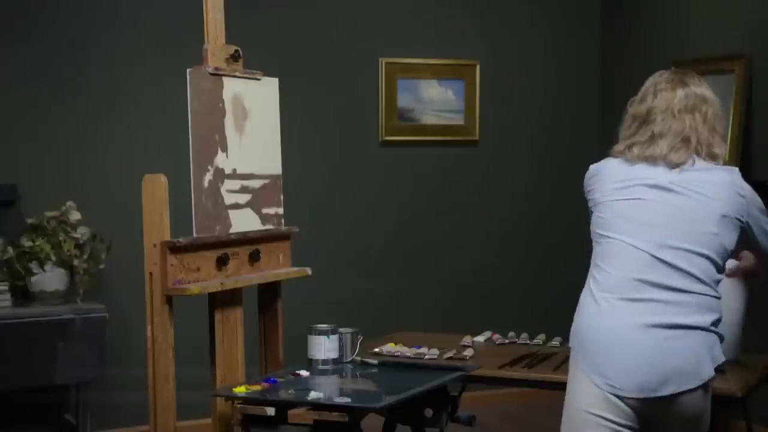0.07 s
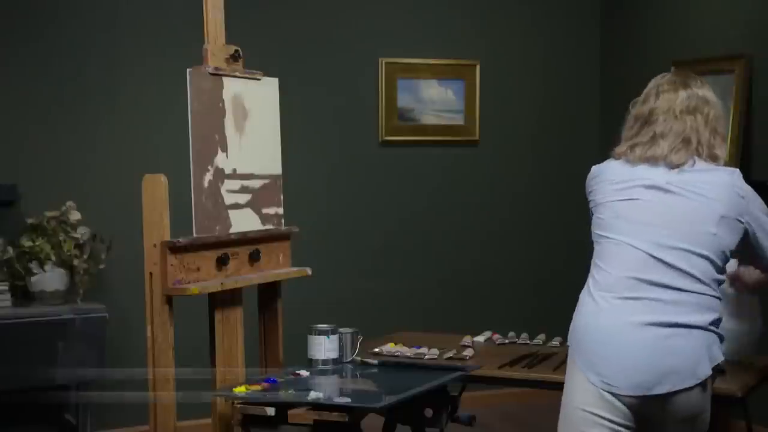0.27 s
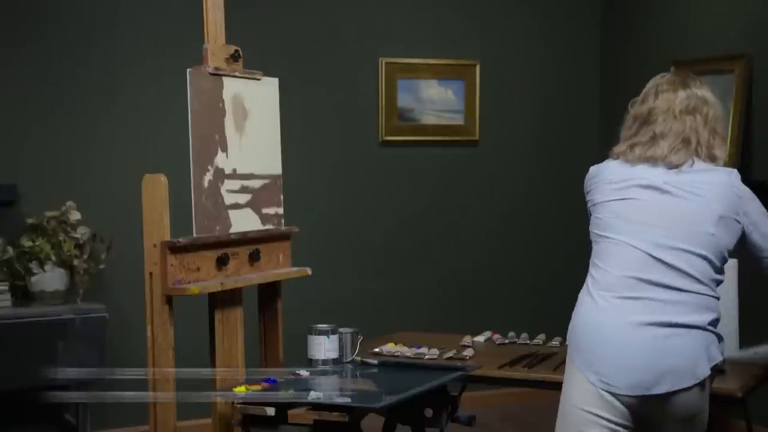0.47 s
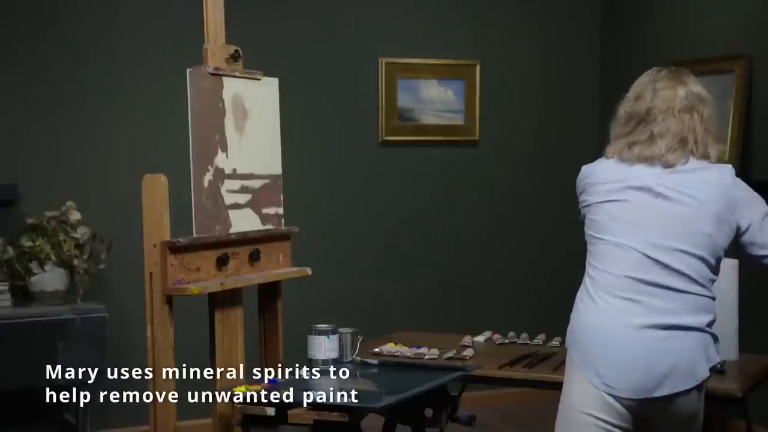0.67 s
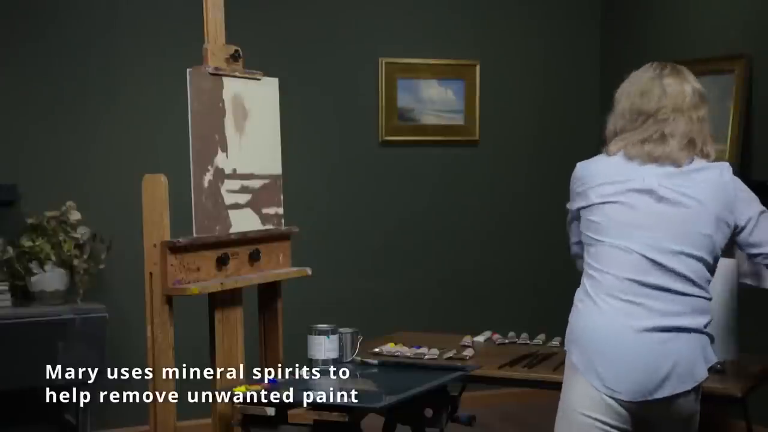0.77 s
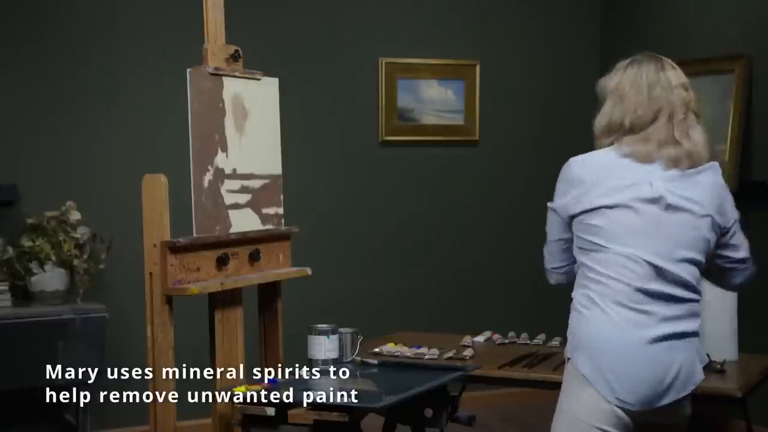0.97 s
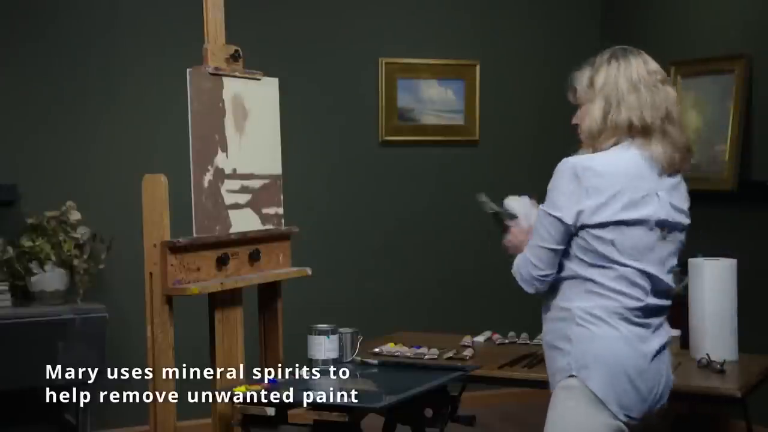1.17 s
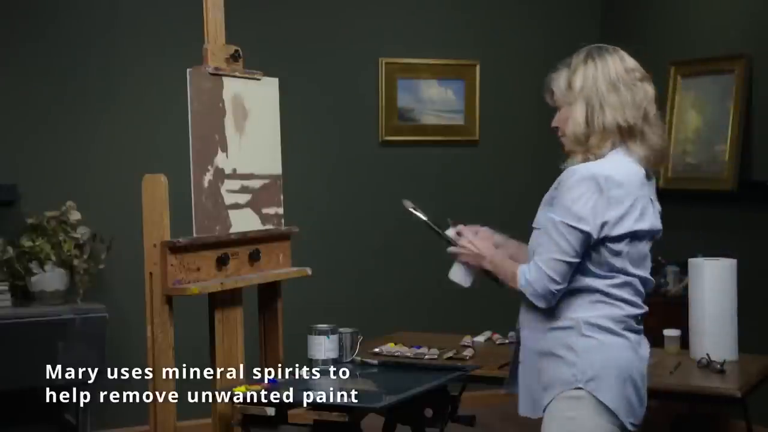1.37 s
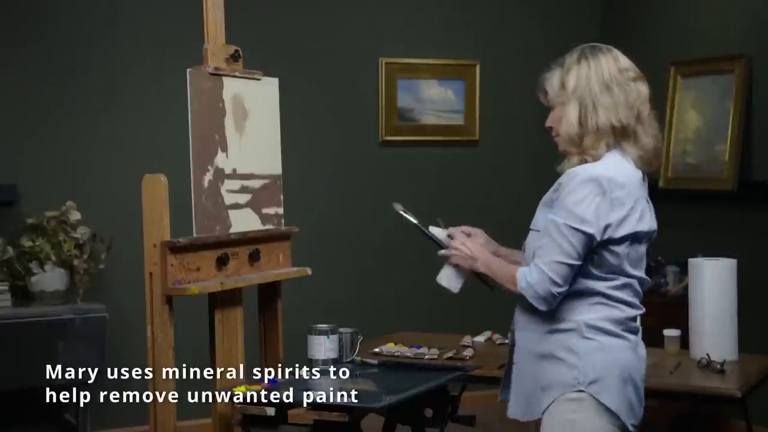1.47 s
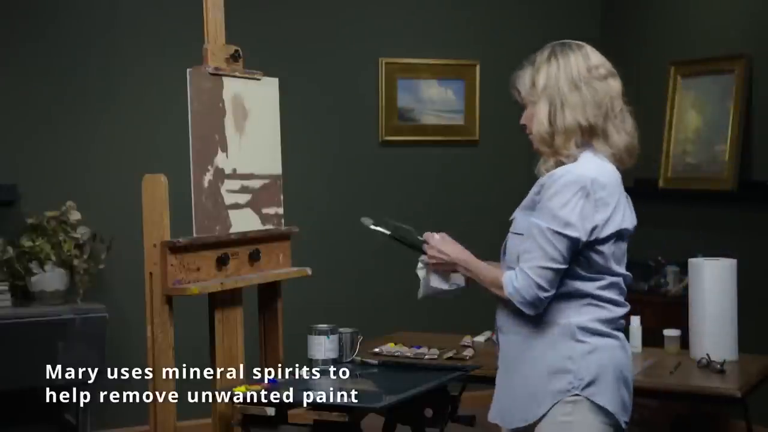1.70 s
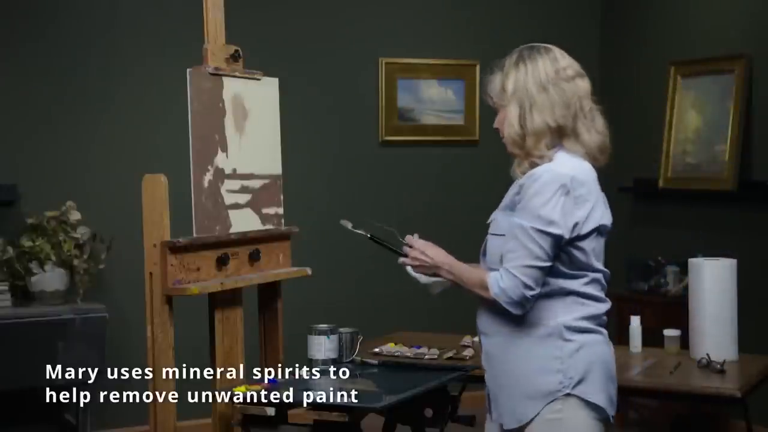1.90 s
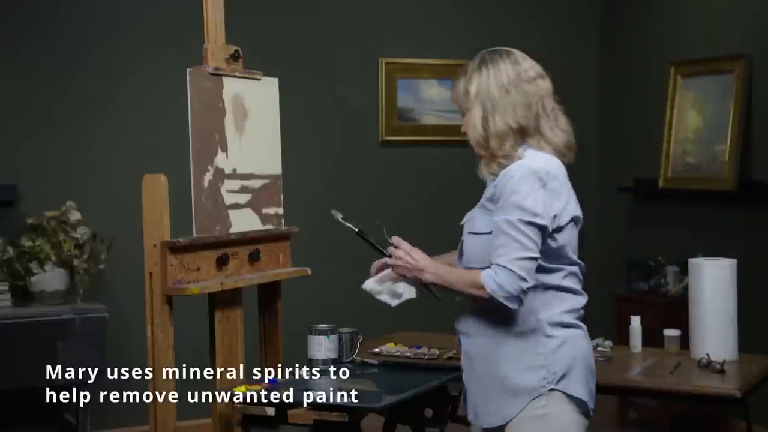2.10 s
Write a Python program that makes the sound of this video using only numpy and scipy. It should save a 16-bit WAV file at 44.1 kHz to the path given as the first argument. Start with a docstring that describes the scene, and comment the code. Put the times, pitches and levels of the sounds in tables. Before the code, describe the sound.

Close up in a quiet studio, a paper towel is ripped from the roll in one short pull. Soft footsteps and rustling sleeves follow as the sheet is gathered and folded, with one light wooden tick.

```python
"""Tearing off a paper towel

A sheet is ripped off its roll, close to a body-worn microphone in a quiet studio. The perforation
gives with a snap and unzips in a run of pops, over a rising flutter as the sheet comes free. Paper and
sleeves rustle, steps thud softly, a wooden handle ticks and the sheet flaps as it is folded."""
import sys
import numpy as np
from scipy import signal
from scipy.fft import rfft, irfft
from scipy.io import wavfile
from scipy.ndimage import uniform_filter1d

SR = 44100
rng = np.random.default_rng(int(sys.argv[2]) if len(sys.argv) > 2 else 0)


def digitize_waveform(pressure):
    """Quantize a signal to 16-bit integers and store it at the path in sys.argv[1].

    Rows of a 2-D input are taken as channels; values are limited to [-1, 1].
    """
    field = np.atleast_2d(pressure).T
    bounded = np.clip(field, -1, 1)
    quanta = np.round(bounded * 32767).astype(np.int16)
    wavfile.write(sys.argv[1], SR, quanta)


N = 94594
T = np.arange(N) / SR

# Tone of breaking fibres. Each row: frequency in Hz, gain in dB.
FIBRE_COLOUR = [(500, -3), (3200, 2.5), (5000, -18), (6500, 0.5), (8500, -5), (11500, -12), (15000, -7)]
# Tone of paper gathered in the hand. Each row: frequency in Hz, gain in dB.
GATHER_COLOUR = [(130, -5), (350, 2), (3200, 1), (6200, -15.5), (8000, -14.5), (10700, -11.5), (13000, -18)]
FIBRES_PER_S, FIBRE_SPREAD_DB = 11000, 1.5
RUBS_PER_S, RUB_SPREAD_DB = 14000, 2


def amp(db):
    """Decibels to gain."""
    return 10 ** (np.asarray(db) / 20)


def unit(x):
    """Scales to rms 1."""
    return x / np.sqrt(np.mean(x ** 2) + 1e-20)


def read(points, hz):
    """Reads a curve on a log-frequency axis."""
    f, value = np.transpose(points)
    return np.interp(np.log(hz + 1), np.log(f + 1), value)


def fader(curve, column=1):
    """Gain over time from a dB curve, dying quickly beyond its ends."""
    columns = np.transpose(curve)
    times, db = columns[0], columns[column]
    outside_s = np.maximum(times[0] - T, 0) + np.maximum(T - times[-1], 0)
    return amp(np.interp(T, times, db) - 1000 * outside_s)


def colour(x, points, depth=1):
    """Minimum-phase EQ; depth scales its dB curve."""
    hz = abs(np.fft.fftfreq(4096, 1 / SR))
    log_gain = np.log(amp(depth * read(points, hz)))
    taps = np.fft.ifft(np.exp(np.conj(signal.hilbert(log_gain)))).real
    return signal.fftconvolve(x, taps[:len(taps) // 2])[:N]


def grains(per_s, spread_db):
    """Random clicks of either sign, a few larger than the rest."""
    size = amp(spread_db * np.minimum(rng.exponential(1, N), 4))
    return size * rng.choice([-1, 1], N) * (rng.random(N) < per_s / SR)


def wander(hz):
    """Smooth random drift of rms 1, up to about the given rate."""
    lowpass = np.exp(-(np.fft.rfftfreq(N, 1 / SR) / hz) ** 2)
    return unit(irfft(rfft(rng.standard_normal(N)) * lowpass, N))


def swell(s, db, width_s):
    """Bell-shaped envelope that peaks at time s."""
    return amp(db) * np.exp(-((T - s) / width_s) ** 2 / 2)


def room_tone():
    """Two steady noise beds: low rumble and soft air."""
    # Tone of each bed. Each row: frequency in Hz, gain in dB.
    rumble_colour = [(30, 1), (125, 1.5), (200, -8), (1500, -46)]
    air_colour = [(50, -22), (125, 2.5), (420, 4), (1400, -5), (4500, -14), (15000, -21)]
    rumble = amp(-63) * unit(colour(rng.standard_normal(N), rumble_colour))
    air = amp(-69) * unit(colour(rng.standard_normal(N), air_colour))
    return rumble, air


def rustle():
    """Paper and sleeves rub in dense tiny slips as the hands reach, gather and fold."""
    # Fader ride of each move. Each row: time in seconds, level in dB.
    reach = [(0, -76), (.06, -65.5), (.15, -69.5), (.21, -60), (.275, -66.5), (.335, -55.5), (.5, -65),
             (.74, -74.5), (.81, -62.5), (.88, -61.5), (.92, -76), (.98, -63)]
    gather = [(1.0, -59), (1.014, -55.5), (1.10, -55.5), (1.15, -53.5), (1.175, -55.5), (1.2, -52.5),
              (1.265, -53.5), (1.31, -60.5), (1.37, -55), (1.42, -56), (1.47, -66.5)]
    fold = [(1.49, -64.5), (1.535, -61.5), (1.575, -72), (1.645, -65.5), (1.715, -52.5), (1.755, -57),
            (1.84, -50.5), (1.88, -52), (1.92, -60.5), (2.03, -67.5), (2.10, -63.5), (2.145, -66)]
    # Tone of the reach and of the fold. Each row: frequency in Hz, gain in dB.
    reach_colour = [(150, -13.5), (400, -2), (1800, -4.5), (3500, -10.5), (5000, -20), (7500, -14),
                    (15000, -20.5)]
    fold_colour = [(150, -13.5), (1000, -8.5), (2000, -5.5), (3800, -12.5), (6000, -21), (8200, -29),
                   (10500, -21.5), (15000, -24)]
    rubs = np.zeros(N)
    for ride, tone in [(reach, reach_colour), (gather, GATHER_COLOUR), (fold, fold_colour)]:
        rubs += fader(ride) * unit(colour(grains(RUBS_PER_S, RUB_SPREAD_DB), tone))
    flicker_db = 0.96 * wander(hz=68.6)
    return rubs * amp(flicker_db)


def scrapes():
    """Dense slips ring one resonance for a moment."""
    # The roll on its holder, the sheet sliding free, paper dragged through the fingers. Each row:
    # centre in seconds, half-width in seconds, pitch in Hz, bandwidth in Hz, level in dB.
    strokes = [(0.062, .04, 1313, 338, -61.5), (0.468, 0.038, 606, 430, -44.5),
               (1.044, 0.028, 8900, 4970, -66), (1.202, 0.0074, 2860, 1690, -49.5),
               (1.407, 0.011, 1580, 1180, -53.5), (1.427, 0.032, 11400, 6000, -66.5)]
    out = np.zeros(N)
    for s, width_s, hz, band_hz, db in strokes:
        b, a = signal.iirpeak(hz, hz / band_hz, SR)
        slips = grains(RUBS_PER_S, RUB_SPREAD_DB)
        ring = signal.lfilter(b, a, signal.lfilter(b, a, slips))
        out += swell(s, db, width_s) * unit(ring)
    return out


def bend(x):
    """Bending waves cross the sheet: lows travel slower, which smears each pop."""
    lag_at_1khz_s = 0.001608
    khz = np.fft.rfftfreq(N, 1 / SR) / 1000
    phase = 4 * np.pi * 1000 * lag_at_1khz_s * np.sqrt(khz)
    return irfft(rfft(x) * np.exp(-1j * phase), N)


def tear():
    """The perforation's bridges pop one after another, and fibres fizz with them."""
    # Fader ride of the rip. Each row: time in seconds, pop level in dB, fizz level in dB.
    ride = [(.335, -84, -60), (.351, -37, -57), (.364, -45, -50.5), (.395, -44, -55), (.44, -45, -58.5),
            (.484, -39.5, -57.5), (.499, -40, -70), (.503, -49.5, -52), (.525, -60, -84)]
    # Tone of a pop in the taut sheet. Each row: frequency in Hz, gain in dB.
    taut_colour = [(30, -37), (170, -13.5), (350, -8), (1200, -1), (2000, -10.5), (3000, -19.5),
                   (3700, -24), (4800, -33.5), (15000, -41)]
    pops_per_s, jitter, spread_db, decay_s = 420, .4, 2.2, .0008
    times = np.cumsum(np.exp(jitter * rng.standard_normal(N // 20))) / pops_per_s
    starts = (times[times < T[-1]] * SR).astype(int)
    onsets = np.zeros(N)
    onsets[starts] = amp(spread_db * np.clip(rng.standard_normal(N), -2, 1))[:len(starts)]
    strain = unit(signal.lfilter([1], [1, -np.exp(-1 / (decay_s * SR))], onsets))
    breaks = strain * rng.choice([-1, 1], N)  # each pop is a tiny cluster of breaks
    pops = unit(colour(bend(breaks), taut_colour))
    pops /= np.sqrt(abs(uniform_filter1d(pops ** 2, size=1000)) + 1e-9)  # a steady pull evens the level
    fizz = unit(colour(grains(FIBRES_PER_S, FIBRE_SPREAD_DB) * (1 + strain), FIBRE_COLOUR))
    return pops * fader(ride) + fizz * fader(ride, column=2)


def flick(s, db, hz):
    """One swing of the sheet: a suck of air, then a push."""
    width_radians = 1.66
    phase = 2 * np.pi * hz * (T - s)
    swing = np.sin(phase) * np.exp(-(phase / width_radians) ** 2 / 2)
    return amp(db) * swing / abs(swing).max()


def snap():
    """Strong bridges break and flick the sheet; the toughest fibres crack."""
    # Bridges giving way. Each row: time in seconds, peak in dB, pitch in Hz.
    bridges = [(.3483, -30, 1000), (.3494, -26.5, 900), (.3506, -24.5, 780), (.3621, -31, 1350),
               (.4044, -34, 1900), (.4152, -32, 1200), (.4219, -33.5, 1400), (.4963, -30, 1380),
               (.4985, -30, 1850)]
    # Fibres cracking. Each row: time in seconds, level in dB.
    cracks = [(0.3481, -33), (0.3504, -35.5), (0.393, -47), (.4152, -62)]
    crack_s = 0.00057
    spikes = sum(amp(db) * np.exp(-abs(T - s) / crack_s) for s, db in cracks)
    fibre_noise = unit(colour(rng.standard_normal(N), FIBRE_COLOUR))
    return sum(flick(*row) for row in bridges) + spikes * fibre_noise


def flutter():
    """The freed edge swings unevenly: a rough zip, faster and harder late in the pull."""
    # Path of the flutter. Each row: time in seconds, rate in Hz, level in dB.
    path = [(0.363, 360.8, -56), (.374, 372.6, -43.5), (0.413, 346.3, -58.5), (0.454, 383.6, -42),
            (0.474, 488, -40.5), (0.486, 487, -38), (.503, 467, -57)]
    jitter, wobble_db, drift_hz = .24, 3, 220
    times, hz, _ = np.transpose(path)
    rate = np.interp(T, times, hz) * (1 + jitter * wander(drift_hz))
    swing = unit(np.sin(2 * np.pi * np.cumsum(rate) / SR))
    return swing * fader(path, column=2) * amp(wobble_db * wander(drift_hz))


def steps():
    """Soft steps and body movement: low damped thuds, each at its own pitch."""
    # Each row: start in seconds, level in dB.
    thuds = [(0.49, -43), (1.003, -40.5), (1.17, -42.5), (1.394, -40), (1.562, -47)]
    typical_hz, decay_s = 89, 0.013
    pitches = typical_hz * np.exp(0.25 * rng.standard_normal(len(thuds)))
    out = np.zeros(N)
    for (s, db), hz in zip(thuds, pitches):
        age = np.maximum(T - s, 0)
        out += amp(db) * np.sin(2 * np.pi * hz * age) * np.exp(-age / decay_s)
    return out


def crinkle():
    """Single creases give way, each in a short, bright cluster of clicks."""
    # Each row: time in seconds, level in dB.
    creases = [(1.188, -55), (1.261, -49.5), (1.59, -61), (1.714, -57), (2.062, -75)]
    bursts = sum(swell(s, db, width_s=0.0018) for s, db in creases)
    return bursts * unit(colour(grains(FIBRES_PER_S, FIBRE_SPREAD_DB), GATHER_COLOUR))


def crumple():
    """The sheet buckles in clusters of dull clicks and flaps taut as it is folded."""
    # Buckling. Each row: centre in seconds, level in dB, half-width in seconds.
    buckles = [(1.463, -53.5, 0.0032), (1.839, -57, 0.0079), (1.854, -46.5, .006), (1.876, -48.5, 0.0051)]
    # Tone of a buckle. Each row: frequency in Hz, gain in dB.
    buckle_colour = [(50, -19), (450, 4), (1300, -5), (2000, -17), (15000, -55)]
    # Flapping. Each row: time in seconds, peak in dB, pitch in Hz.
    flaps = [(1.4648, -48.5, 388), (1.829, -36, 1090), (1.8675, -31.5, 644)]
    bursts = sum(swell(*row) for row in buckles)
    clicks = unit(colour(grains(per_s=770, spread_db=0.5), buckle_colour))
    return bursts * clicks + sum(flick(*row) for row in flaps)


def tick():
    """A thin wooden handle, softly struck, rings very briefly."""
    # The handle's modes. Each row: pitch in Hz, level in dB, time to fall 60 dB in seconds.
    modes = [(2620, -40, 0.015), (3030, -40, 0.006)]
    start_s, rise_s = 1.4909, 0.00024
    age = np.maximum(T - start_s, 0)
    ring = sum(amp(db - 60 * age / t60) * np.sin(2 * np.pi * hz * age) for hz, db, t60 in modes)
    return ring * (1 - np.exp(-(age / rise_s) ** 2))


def studio(x):
    """Early reflections and a short tail; low reflections add width and the image leans right."""
    # Decay of the tail. Each row: frequency in Hz, time to fall 60 dB in seconds.
    tail_t60 = [(200, 1), (600, 0.5), (1400, .5), (5000, 0.38)]
    # Tone of the tail and of the side reflections. Each row: frequency in Hz, gain in dB.
    tail_colour = [(100, -8), (1200, 3), (12000, -8.5)]
    side_colour = [(170, -0.5), (450, -5), (1000, -21), (15000, -31)]
    # Panning EQ, scaled for each channel below. Each row: frequency in Hz, leftward tilt in dB.
    balance = [(100, 0), (700, -2.8), (3500, -2.4), (9000, -.5)]
    early_db, tail_db, early_decay_s, side_decay_s = -15, -15.5, 0.012, 0.0097

    def echo(taps):
        return signal.fftconvolve(x, taps / np.linalg.norm(taps))[:N]

    t = T[:SR // 2]
    early, wide, late = rng.standard_normal((3, len(t))) * (rng.random((3, len(t))) < .1) * (t > .002)
    hz, age, bands = signal.stft(late, SR, nperseg=256)
    decay = amp(-60 * age / read(tail_t60, hz)[:, None])
    tail = signal.istft(bands * decay, SR, nperseg=256)[1]
    mid = x + amp(early_db) * echo(early * np.exp(-t / early_decay_s))
    mid += amp(tail_db) * colour(echo(tail), tail_colour)
    side = colour(echo(wide * np.exp(-t / side_decay_s)), side_colour)
    return np.array([colour(mid, balance, depth=0.7) + side, colour(mid, balance, depth=-0.37) - side])


def scene():
    """Paper and handle in the studio, over steps and room tone."""
    paper = snap() + tear() + flutter() + rustle() + crumple() + crinkle() + scrapes()
    thuds = steps()
    rumble, air = room_tone()
    bass_pan = np.array([[1], [-amp(-12)]])  # full on the left, weak and inverted on the right
    return studio(paper + tick()) + (thuds + rumble) * bass_pan + air


def record(dry):
    """A steep low-pass trims the very top."""
    cutoff_hz = 15560
    lowpass = signal.firwin(1023, cutoff_hz, window=("kaiser", 9), fs=SR)
    return signal.oaconvolve(dry, lowpass[None], "same")


dry = scene()
out = record(dry)
digitize_waveform(out)
```